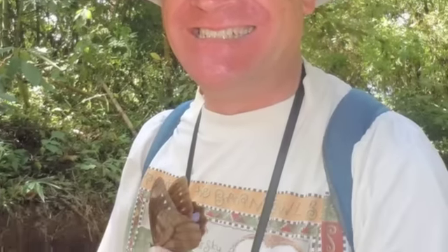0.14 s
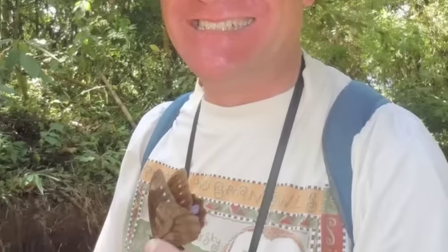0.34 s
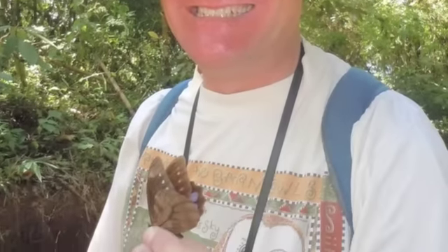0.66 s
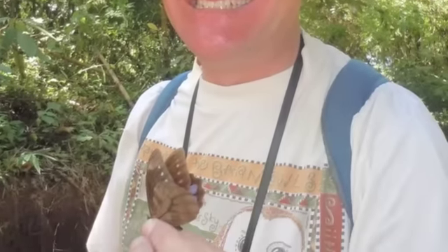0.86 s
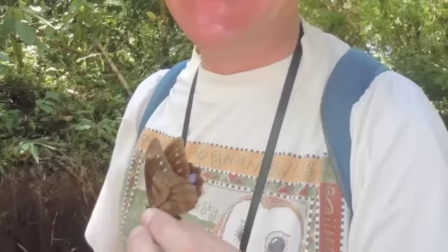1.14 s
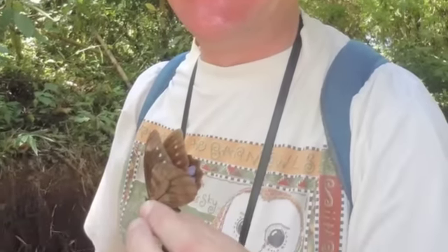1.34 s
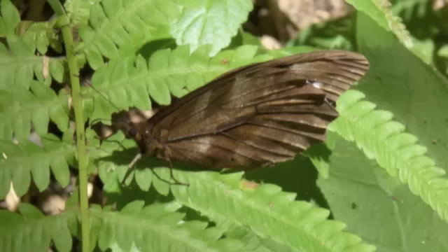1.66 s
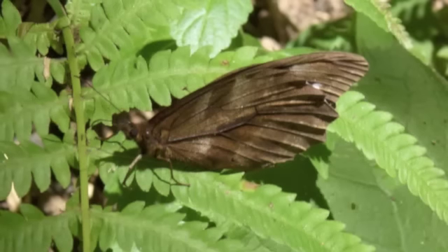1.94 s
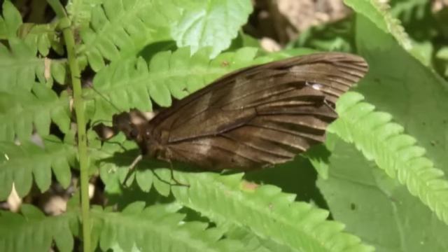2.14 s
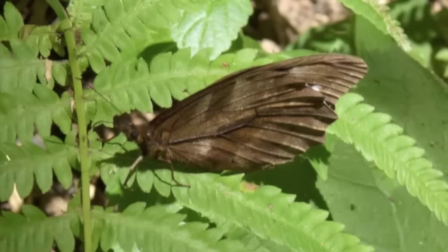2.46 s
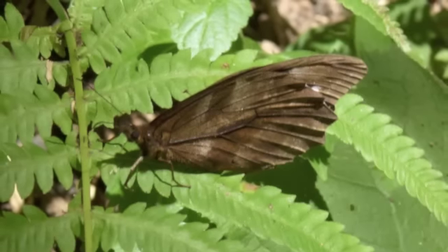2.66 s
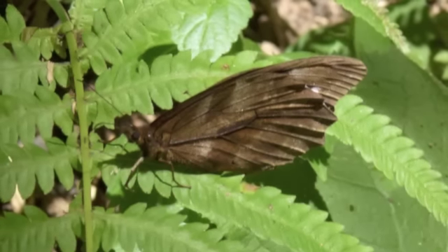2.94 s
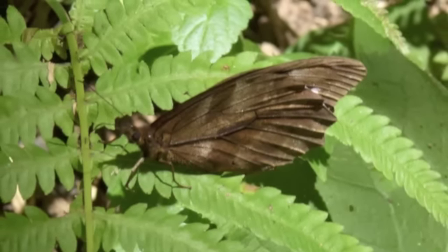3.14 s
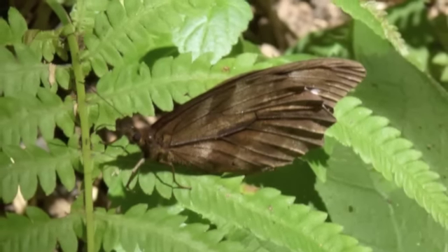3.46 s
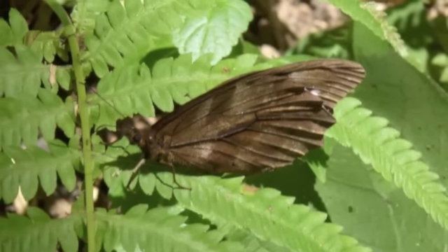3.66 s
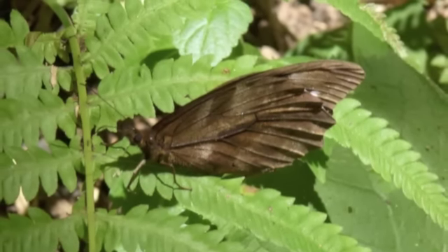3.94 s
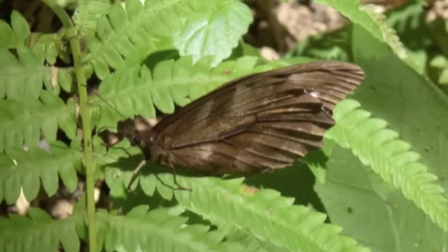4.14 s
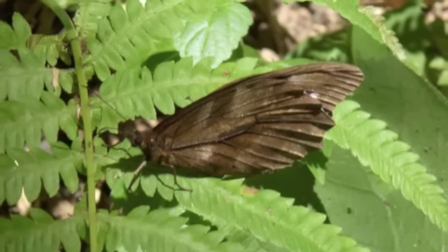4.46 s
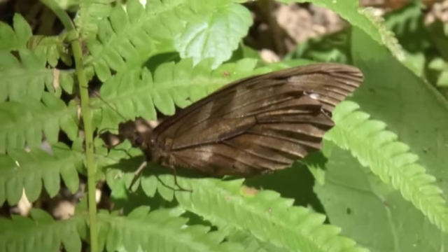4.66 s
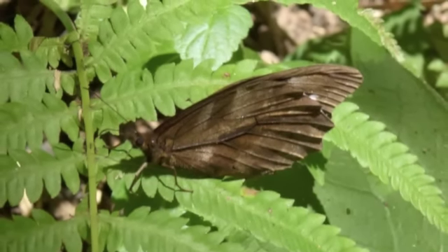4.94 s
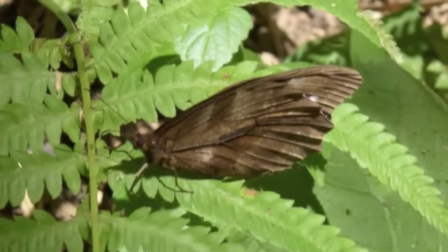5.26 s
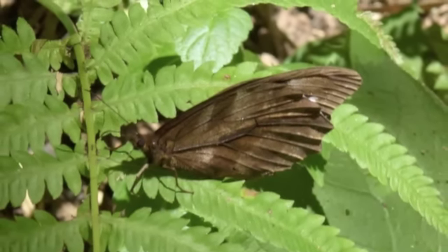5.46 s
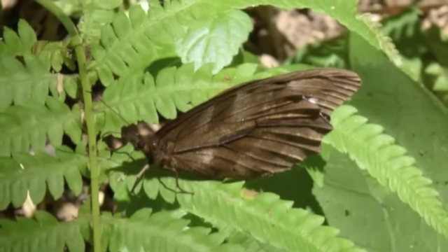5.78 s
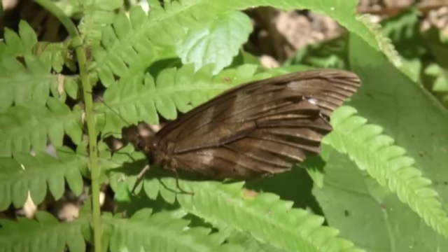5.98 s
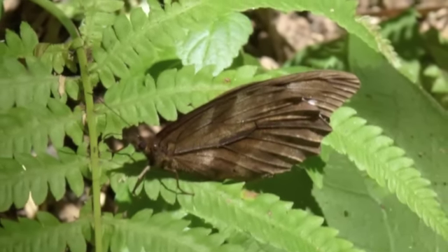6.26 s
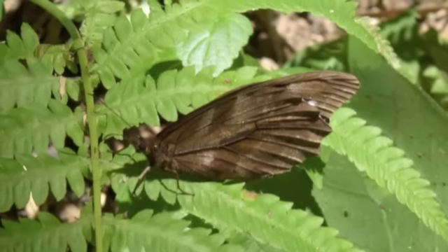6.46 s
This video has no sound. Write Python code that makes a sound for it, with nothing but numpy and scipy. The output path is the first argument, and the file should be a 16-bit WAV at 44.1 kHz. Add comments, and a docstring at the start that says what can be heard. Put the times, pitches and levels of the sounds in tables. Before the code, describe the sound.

A high cicada drone and a soft hush of leaves fill a forest throughout, with crickets trilling and katydids rasping in short bouts. In the first half second, birds give two high falling whistles, followed by fainter, more distant glides that echo among the trees. At about 2.2 seconds a close bird, slightly left, starts a two-note hoot: a short falling chuck, then a slightly longer, lower hoo. It repeats this ten times, a little over twice a second, growing louder until about 4 seconds and holding steady to the end, near 6.6 seconds. From around 3.5 seconds the other birds get busier, with thin high chips, quick pips and rising slurs, plus arched whistles near 4.7 and 5.8 seconds. Blurred, far-off birdsong swells and fades behind them. A few faint, dull snaps come from the undergrowth around 1, 2, 3 and 6 seconds.

```python
"""A near bird hoots two-note phrases in a forest, heard in stereo. Other birds whistle and chirp deeper
among the trunks, where scattered echoes smear each glide. Crickets trill in bouts of wing strokes,
katydids rasp high up and a cicada chorus drones. Under it all lies a hush of leaves and far
wildlife, with a few dull snaps in the undergrowth."""
import sys
import numpy as np
from scipy import signal
from scipy.fft import rfft, irfft, next_fast_len
from scipy.io import wavfile
from scipy.ndimage import uniform_filter1d

SR = 44100
rng = np.random.default_rng(int(sys.argv[2]) if len(sys.argv) > 2 else 0)


def bounce(signal):
    """Save signal as a 16-bit WAV file at the path given by the first command-line argument."""
    frames = np.transpose(np.atleast_2d(signal))
    limited = np.clip(frames, -1, 1)
    pcm = np.round(limited * 32767).astype(np.int16)
    wavfile.write(sys.argv[1], SR, pcm)


N = 291501
TIME = np.arange(N) / SR
FFT_SIZE = next_fast_len(N)
BIN_HZ = np.fft.rfftfreq(FFT_SIZE, 1 / SR) + 1e-3
PREROLL = SR // 4  # samples of song before the start, whose echoes still ring


def hooting_bird():
    """A close bird: a short falling chuck, then a longer hoo, mostly direct sound with a faint octave."""
    # note contours: length_share, pitch_ratio, level_db
    chuck_shape = [(0, .99, -17), (.17, 1.0, -5), (.32, 0.933, 1.5), (.46, 0.835, -3), (.62, .825, -3),
                   (1, 0.82, -15)]
    hoo_shape = [(0, .95, -16.5), (.2, 1.0, -6.5), (.5, 1.0, -1), (.8, 1.005, -0.5), (.92, 1.015, -2),
                 (1, 1.043, -12.5)]
    # opening notes: start_s, length_s, pitch_hz, level_db, accent (0-1, how sharply the level peaks)
    chucks = [(2.243, 0.07, 674, -31, 0.46), (2.791, .065, 692, -26.5, 0.57), (3.24, 0.053, 695, -21, 0.75),
              (3.663, 0.055, 709, -19, .9), (4.093, 0.048, 722, -17.5, 0.9), (4.547, 0.053, 720, -18, 1.0),
              (4.981, .047, 719.5, -17.5, 0.98), (5.407, 0.055, 717.6, -17.5, 1.0),
              (5.834, 0.046, 723, -16.5, 0.68), (6.261, 0.054, 727, -17, 0.95)]
    # answering notes: start_s, length_s, pitch_hz, level_db, extra_rise_hz
    hoos = [(2.38, 0.1145, 589.6, -23, 47.5), (2.95, 0.094, 599.3, -20.5, 26),
            (3.375, 0.085, 620.4, -17.5, 1.5), (3.799, 0.084, 620, -17.5, -4),
            (4.22, 0.081, 622, -16.5, 1.5), (4.688, 0.082, 621, -16.5, 0), (5.112, 0.084, 622.4, -16.5, -3),
            (5.542, 0.078, 624.5, -16, -6), (5.963, 0.081, 623.4, -16, 3), (6.392, 0.084, 616.6, -16, -1)]
    notes = [note(chuck_shape, *row, accent=accent) for *row, accent in chucks]
    notes += [note(hoo_shape, *row) for row in hoos]
    voice = np.zeros((1, PREROLL + N))
    for curve in notes:
        sing(voice, curve, gain=1, octave=undb(-18.5))
    right_lag = int(.00023 * SR)  # the left microphone hears the bird first
    direct = np.array([voice[0], np.roll(voice[0], right_lag)])[:, PREROLL:]
    tail = undb(-12) * forest_echoes(voice, t60_s=1.6, early_s=0.17, early_db=0, rise_s=0.051)
    return pan(direct, -3.5) + pan(tail, 1.5)


def songbirds():
    """Whistles among the trunks: the further the bird, the weaker its direct sound, the longer its tail."""
    direct, near_send, far_send = np.zeros((3, 2, PREROLL + N))
    for presence_db, pan_db, curve in repeated_calls() + glides():
        distance = np.clip(-presence_db / 14, 0, 1)  # at 1 only echoes arrive
        sing(near_send, curve, pan(np.sqrt(1 - distance), pan_db))
        sing(far_send, curve, pan(np.sqrt(distance), pan_db))
        sing(direct, curve, pan(undb(presence_db) * (1 - distance), pan_db))
    # moving air and leaves on the path make the direct sound flutter
    flutter = undb(3.5 * np.array([drift(70), drift(70)]) + 3.5 * drift(70))
    near_tail = forest_echoes(near_send, t60_s=0.69, early_s=0.11, early_db=6.5, rise_s=0.003)
    far_tail = forest_echoes(far_send, t60_s=1.55, early_s=0.094, early_db=5.4, rise_s=0.026)
    return direct[:, PREROLL:] * flutter + near_tail + far_tail


def repeated_calls():
    """Arched whistles, rising pips, falling chips and upslurs, each as (presence_db, pan_db, curve)."""
    # note contours: length_share, pitch_ratio, level_db
    arch_shape = [(0, 1.06, -8), (.2, .995, -5), (.42, 1.01, -4.5), (.72, 1.135, 3), (1, 1.14, -23)]
    pip_shape = [(0, 1, -18), (.55, 1.1, -2), (1, 1.24, -15)]
    chip_shape = [(0, 0.99, 1), (.42, .87, -0.5), (1, .74, -4)]
    # calls on those contours: start_s, length_s, pitch_hz, level_db
    arches = [(4.679, 0.23, 2684, -20), (5.799, .22, 2660, -22)]
    pips = [(4.966, .025, 2350, -34), (5.01, .03, 2370, -36), (5.211, 0.0314, 2300, -30),
            (5.249, 0.0284, 2350, -42), (5.395, .025, 2350, -43), (5.48, 0.031, 2350, -23.5),
            (5.52, 0.03, 2370, -28.5)]
    chips = [(3.796, 0.028, 4910, -23), (4.07, 0.031, 4640, -21), (4.341, 0.032, 4590, -22.5),
             (4.86, 0.026, 4480, -23), (5.115, .035, 4540, -22.5), (5.4, .03, 4490, -22.5),
             (6.0, 0.027, 4630, -23.5), (6.28, 0.034, 4610, -24)]
    # held notes that slide up: start_s, held_s, slide_s, pitch_hz, held_db, slide_db
    upslurs = [(4.255, 0.051, 0.083, 1516, -34, -26), (4.863, 0.016, .076, 1665, -30.5, -17),
               (5.122, .035, .042, 1706, -25.5, -19), (5.36, .055, .055, 1696, -25.5, -21.5)]
    return ([(-9, 2, note(arch_shape, *row)) for row in arches]
            + [(3, 2, note(pip_shape, *row)) for row in pips]
            + [(-9.5, 1, note(chip_shape, *row)) for row in chips]
            + [(-3, 0.5, upslur(*row)) for row in upslurs])


def glides():
    """Single sliding whistles that swell and fade, each as (presence_db, pan_db, curve)."""
    # whistles: start_s, length_s, first_hz, last_hz, level_db, peak_share, presence_db, pan_db
    whistles = [(-.07, 0.13, 4904, 3960, -13, 0.41, -7, .5), (-.15, 0.079, 1958, 1917, -29, 0.87, -20, -6),
                (0.264, .35, 6150, 3680, -13.5, 0.41, -7, 0),
                (0.421, 0.029, 2166, 2277, -18.5, 0.1, -1.5, -8.5),
                (0.467, 0.036, 1943, 1915, -17.5, 0.2, -4, 0),
                (0.416, 0.036, 1085, 1130, -40.5, 0.5, 0.5, 3), (.42, 0.17, 1622, 1540, -36, 0.1, -16, 7),
                (0.461, 0.13, 2070, 3445, -25.5, 0.2, -17, 3),
                (0.789, 0.084, 1998, 3480, -30, 0.5, -18, -5.5),
                (1.027, 0.11, 1610, 1576, -36, 0.06, -5.5, 1), (1.118, 0.095, 2092, 3457, -28, 0.6, -11, 2),
                (1.419, 0.35, 2753, 1624, -31.5, 0.13, -17.5, 4.5),
                (2.298, .15, 2666, 2686, -25, 0.3, -8.5, 0), (2.435, .11, 2787, 4850, -23.5, 0.34, -16, 1),
                (3.561, .16, 2644, 3040, -25.5, 0.95, -9.5, -1),
                (3.713, 0.072, 3028, 3057, -25.5, 0, -4, 2), (4.52, 0.12, 4480, 3370, -24.5, 1, -10, -0.5),
                (5.645, .085, 4330, 3283, -22.5, 0.54, -10.5, 0), (3.196, .06, 4000, 4730, -41, .6, -19, 2),
                (1.532, 0.068, 2300, 1866, -41, 0.3, -4, -4), (3.533, 0.041, 2220, 1910, -42, 0.3, -1, 7),
                (3.825, 0.066, 3050, 3037, -31, 0.6, -4, -8), (3.874, 0.15, 2987, 2020, -30, 0.45, -3, 4),
                (4.147, 0.14, 2512, 1727, -29, 0.76, -8, -2),
                (5.595, 0.058, 4410, 4290, -24.5, 0.3, -9, -2),
                (5.606, 0.04, 6950, 7130, -24, 0.65, -18, -7),
                (6.097, 0.16, 2684, 2118, -28.5, 0.6, -6.5, 0.5),
                (6.13, 0.033, 5580, 6260, -18.5, 0.9, -10.5, 2),
                (6.27, 0.042, 5310, 6070, -23.5, 0.86, -9, -1),
                (6.355, 0.16, 2204, 1523, -33.5, 0.48, -6, 2), (2.23, 0.037, 6730, 7130, -22.5, 0, -10, 11)]
    share = np.linspace(0, 1, 12)
    notes = []
    for start, length, first_hz, last_hz, db, peak, presence_db, pan_db in whistles:
        ease = 1.3 if last_hz < first_hz else 1  # falls flatten out towards their end
        pitch_hz = last_hz + (first_hz - last_hz) * (1 - share) ** ease
        peak = np.clip(peak, .05, .95)
        end_db = -4.5 - 69.5 * (1 - peak) * length  # long glides die away further
        swell_db = np.interp(share, [0, peak, 1], [-3.5, 0, end_db])
        curve = np.transpose([start + share * length, pitch_hz, db + swell_db])
        notes.append((presence_db, pan_db, curve))
    return notes


def upslur(start, held, slide, hz, held_db, slide_db):
    """The curve of a held note that slides up a fifth, loudest near its top."""
    bend = start + held
    return [(start, hz, held_db - 9), (start + 0.49 * held, hz, held_db),
            (bend, 1.02 * hz, held_db - 3.5),
            (bend + 0.74 * slide, 1.4 * hz, slide_db), (bend + slide, 1.5 * hz, slide_db - 9)]


def note(shape, start, length, hz, db, rise_hz=0, accent=1):
    """Stretch a contour into a curve of time_s, pitch_hz, level_db."""
    return [(start + share * length, ratio * hz + (share - .66) * rise_hz, db + accent * shape_db)
            for share, ratio, shape_db in shape]


def sing(bus, curve, gain, octave=0):
    """Add a syrinx note to the bus: a near sine that follows the curve, with soft ends."""
    time_s, pitch_hz, level_db = np.transpose(curve)
    start = int((time_s[0] - .006) * SR)
    t = np.arange(start, int((time_s[-1] + .006) * SR)) / SR
    fade = np.clip(np.minimum(t - time_s[0], time_s[-1] - t) / 0.0075 + 1, 0, 1)
    envelope = np.sqrt(2) * fade * undb(np.interp(t, time_s, level_db))
    phase = 2 * np.pi * np.cumsum(np.interp(t, time_s, pitch_hz)) / SR
    tone = np.sin(phase) + octave * np.sin(2 * phase)
    bus[:, PREROLL + start:PREROLL + start + len(t)] += gain * envelope * tone


def forest_echoes(x, t60_s, early_s, early_db, rise_s):
    """Scatter off trunks and leaves: a dense early bunch and a long tail, unrelated left and right."""
    t = TIME[:2 * SR]
    decay = undb(-60 * t / t60_s) + undb(early_db - 60 * t / early_s)
    envelope = (1 - np.exp(-t / rise_s)) * decay
    impulse = envelope * rng.standard_normal((2, len(t))) / np.sqrt(np.sum(envelope ** 2))
    return signal.fftconvolve(x, impulse, axes=1)[:, PREROLL:PREROLL + N]


def far_birds():
    """Song from deep in the forest arrives as echo only: two soft bands that swell and fade."""
    # band faders: time_s, low_band_db, high_band_db
    swells = [(0.0, -29, -46), (0.3, -32, -62), (0.96, -30, -47), (1.42, -32.5, -38.5), (1.9, -63, -47),
              (2.21, -37.5, -47), (2.62, -36, -37), (2.8, -63, -34), (3.071, -48, -42.5),
              (3.59, -50, -32.5), (3.83, -36.5, -48), (4.03, -27, -38), (4.62, -32.5, -25.5),
              (4.75, -61, -27.5), (4.931, -25.5, -28.5), (5.3, -26.5, -34), (5.85, -32.5, -31),
              (6.61, -37, -37.5)]
    time_s, low_db, high_db = np.transpose(swells)
    out, trim_db = 0, -3.5
    for db, hz, width_hz in ((low_db, 2550, 1700), (high_db, 4100, 1900)):
        band = unit_rms(resonate(rng.standard_normal((2, N)), hz, width_hz, order=4))
        out += undb(np.interp(TIME, time_s, db) + trim_db) * band
    return out


def crickets():
    """Wing strokes in quick chirps: a wavering tone, blurred by leaves."""
    # bouts: start_s, end_s, pitch_hz, width_hz, chirp_rate_hz, level_db, pan_db
    bouts = [(0, 0.2, 5400, 70, 23, -33, 6), (1.084, 1.816, 5400, 72, 23, -36, 9.5),
             (1.87, 2.634, 5596, 72, 23, -40.5, -11.5), (2.64, 3.32, 5400, 71.1, 21.4, -35.5, 11.5),
             (4.054, 4.707, 5410, 89.6, 21.3, -38, 11), (5.46, 6.133, 5385, 110.7, 22, -36.5, 6.5),
             (.06, 0.276, 6040, 40, 27, -33.5, 2), (.82, 1.118, 6000, 39.5, 49, -38.5, 5),
             (1.951, 2.126, 5990, 40.5, 38, -38, 12), (2.568, 2.757, 6000, 40.5, 40, -39, 7),
             (3.023, 3.18, 6040, 41, 42, -38, 7), (3.606, 3.76, 5920, 40.3, 40, -39, 5),
             (4.135, 4.285, 6000, 39, 40, -38, 6), (4.46, 4.816, 5960, 40.2, 44, -43, 8),
             (4.85, 5.315, 6060, 72.8, 40, -39, 0), (4.998, 5.343, 5960, 50.2, 40, -41.5, -2),
             (5.555, 6.002, 6150, 68.9, 40, -38, 2)]
    out, noise = np.zeros((2, N)), rng.standard_normal((2, N))
    for start, end, hz, width_hz, rate_hz, db, pan_db in bouts:
        gate = np.clip(np.minimum(TIME - start, end - TIME) / 0.03 + .5, 0, 1)
        beat = 2 * np.pi * rate_hz * TIME
        trill = (1 + 0.083 * np.cos(beat)) * (1 + 0.16 * np.cos(2 * beat)) * (1 + 0.27 * np.cos(4 * beat))
        pitch_hz = hz + .45 * width_hz * drift(90)
        tone = np.sqrt(2) * np.sin(2 * np.pi * np.cumsum(pitch_hz) / SR)
        blur = .75 * unit_rms(resonate(noise, hz, width_hz))
        # a noise skirt below the note stands for the pitch sag at the end of each stroke
        skirt = .6 * unit_rms(resonate(noise, hz - 2 * width_hz, 3 * width_hz))
        out += pan(undb(db) * gate * trill * (tone + blur + skirt), pan_db)
    return out


def katydids():
    """File strokes in swelling bouts ring a high wing note and, in some, a broad hiss above it."""
    # bouts: start_s, peak_s, end_s, pitch_hz, base_width_hz, note_db, hiss_db
    bouts = [(-.2, 0, 0.32, 7610, 885, -30, -38), (.05, .1, 0.59, 7300, 696, -33.5, -72),
             (0.862, 1.0, 1.33, 7180, 402, -33.5, -79), (1.06, 1.175, 1.53, 7720, 800, -40.5, -78),
             (2.326, 2.65, 2.91, 8240, 770, -42, -49), (2.497, 2.7, 3.08, 7400, 600, -46, -56),
             (3.77, 3.9, 4.2, 8300, 700, -43.5, -44.5), (5.014, 5.25, 5.5, 8400, 704, -44, -43),
             (5.75, 5.825, 6.16, 7590, 710, -33, -85), (6.023, 6.3, 6.85, 8170, 969, -42, -87),
             (3.98, 4.9, 5.5, 7460, 498, -49, -51.5), (5.9, 6.308, 6.5, 7400, 510, -38.5, -80)]
    strokes = rasp(spread_db=0.73, correlation=0.43)
    hiss = unit_rms(resonate(strokes, 15000, 11000, order=6))
    out = 0
    for start, peak, end, hz, base_width_hz, note_db, hiss_db in bouts:
        swell = np.interp(TIME, [start, peak, end], [0, 1, 0]) ** 0.46
        wing = unit_rms(resonate(strokes, hz, 1.3 * base_width_hz, order=6))
        out += swell * (undb(note_db) * wing + swell ** 2 * undb(hiss_db) * hiss)
    return out


def cicadas():
    """Many singers blend into droning bands that waver in level."""
    # chorus bands: pitch_hz, width_hz, level_db
    bands = [(6450, 226, -34.5), (6614, 195, -34), (6205, 340, -35), (5550, 360, -38), (6995, 39, -45.5)]
    out = 0
    for hz, width_hz, db in bands:
        level = undb(db + 0.43 * drift(2.89) + 1.42 * drift(20))
        buzz = rasp(spread_db=0.32, correlation=0.21)
        out += level * unit_rms(resonate(buzz, hz, width_hz, order=3))
    return out


def rasp(spread_db, correlation):
    """Insect clicks of uneven size, so dense they merge into noise, partly shared left and right."""
    noise = rng.standard_normal((3, N))
    stereo = np.sqrt(correlation) * noise[0] + np.sqrt(1 - correlation) * noise[1:]
    return stereo * undb(spread_db * drift(400))


def undergrowth_snaps():
    """Twigs or drops: tiny noise bursts, dulled by a broad resonance."""
    # snaps: start_s, burst_db
    snaps = [(1.087, -19), (1.85, -25), (3.22, -26), (3.34, -26), (5.925, -18), (5.95, -23)]
    bursts, age = np.zeros(N), np.arange(400)  # age in samples
    envelope = age / 40 * np.exp(-age / 60)
    for start_s, db in snaps:
        bursts[int(start_s * SR) + age] += undb(db) * envelope * rng.standard_normal(len(age))
    return 3 * resonate(bursts, 1300, 2600, order=6)


def hush():
    """Leaves, far insects and far birds blur into a coloured hiss, widest in the top treble."""
    # tone colour: frequency_hz, relative_db
    spectrum = [(30, -29.5), (245, -33.5), (404, -19), (780, -22.5), (1150, -18), (2290, -16), (3100, -18),
                (3700, -28), (4400, -20.5), (5400, -11.5), (6900, -10.5), (7670, -71), (9710, -49),
                (10800, -34.5), (15900, -32)]
    # likeness of left and right: frequency_hz, correlation
    stereo_image = [(30, 0.25), (130, 0.17), (290, 0.83), (640, 0.4), (1400, 0.28), (5000, 0.38),
                    (15000, 0.046)]
    colour = undb(over_bins(spectrum))
    correlation = np.clip(over_bins(stereo_image), 0, .99)
    noise = rfft(rng.standard_normal((2, FFT_SIZE)))
    mid, side = noise * colour * np.sqrt([1 + correlation, 1 - correlation])
    bed = unit_rms(irfft(np.array([mid + side, mid - side]), FFT_SIZE)[:, :N])
    return undb(-33 + 0.72 * drift(1.78) + 1.1 * drift(16)) * bed


def over_bins(points):
    """Draw (frequency_hz, value) points across the FFT bins on a log-frequency axis."""
    hz, values = np.transpose(points)
    return np.interp(np.log(BIN_HZ), np.log(hz), values)


def resonate(x, hz, width_hz, order=2):
    """A resonance applied order times; width_hz is the width of one pass."""
    detuning = (BIN_HZ / hz - hz / BIN_HZ) * hz / width_hz
    return irfft(rfft(x, FFT_SIZE) / (1 + 1j * detuning) ** order, FFT_SIZE)[..., :N]


def drift(rate_hz):
    """A smooth wobble: random steps at rate_hz, slewed twice."""
    hold = int(SR / rate_hz)
    steps = np.repeat(rng.standard_normal(N // hold + 1), hold)
    return uniform_filter1d(uniform_filter1d(steps, hold), hold)[:N]


def pan(x, db):
    """Place a sound by level: db is left minus right."""
    return x * undb(np.array([[db], [-db]]) / 2)


def undb(db):
    return 10 ** (np.asarray(db) / 20)


def unit_rms(x):
    return x / np.sqrt(np.mean(x ** 2))


def scene():
    """Birds in front, insects around them, the forest bed underneath."""
    birds = hooting_bird() + songbirds() + far_birds()
    insects = crickets() + katydids() + cicadas()
    return birds + insects + hush() + undergrowth_snaps()


def record(dry):
    """The recorder cuts the top with a steep low-pass."""
    cutoff_hz = 15900
    return signal.sosfilt(signal.ellip(10, .2, 80, cutoff_hz, fs=SR, output="sos"), dry)


dry = scene()
out = record(dry)
bounce(out)
```